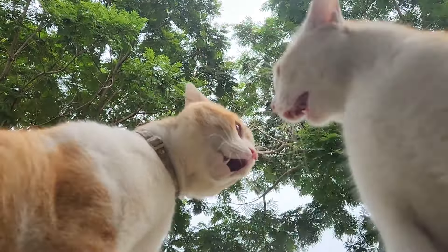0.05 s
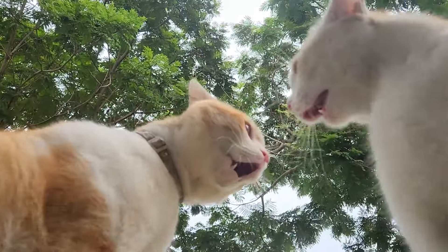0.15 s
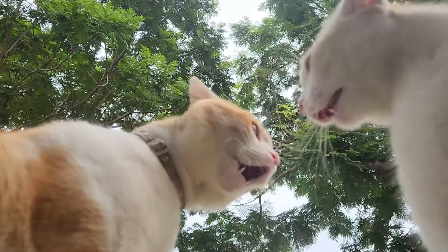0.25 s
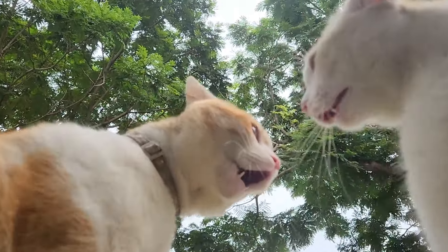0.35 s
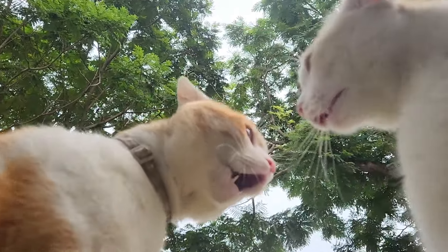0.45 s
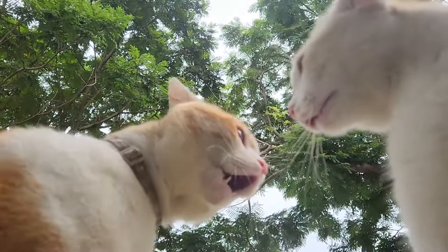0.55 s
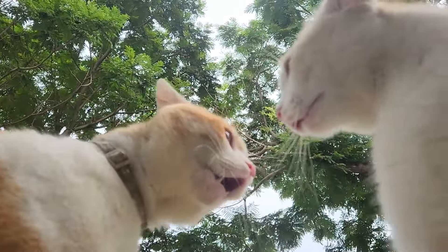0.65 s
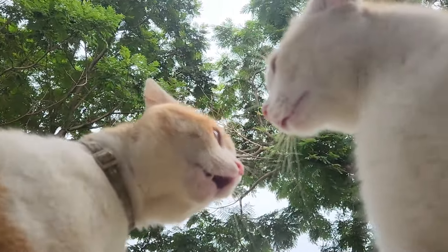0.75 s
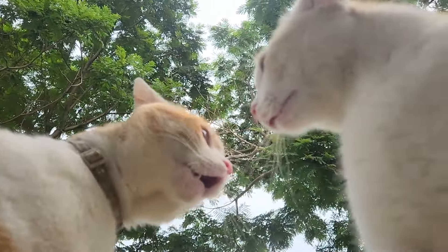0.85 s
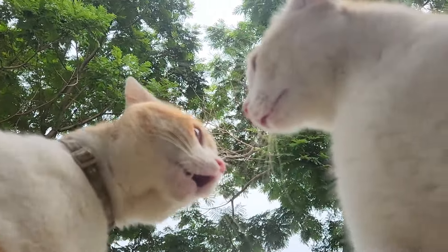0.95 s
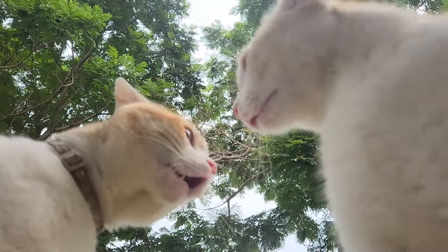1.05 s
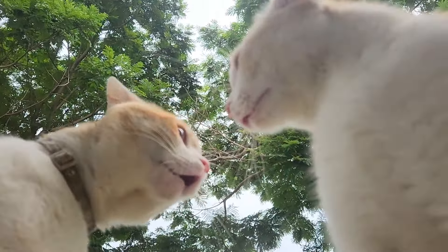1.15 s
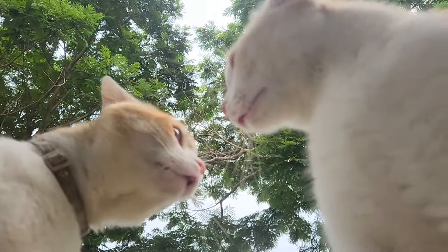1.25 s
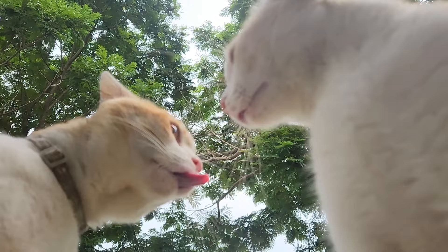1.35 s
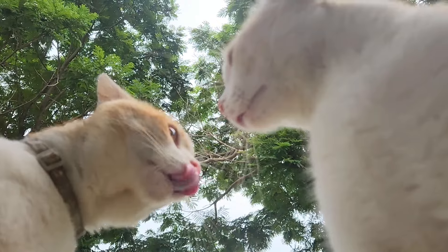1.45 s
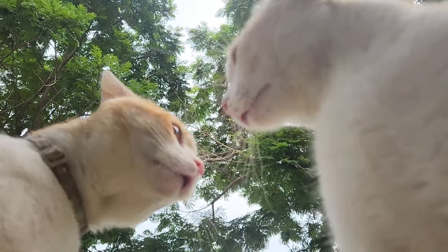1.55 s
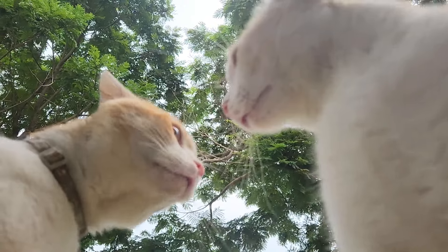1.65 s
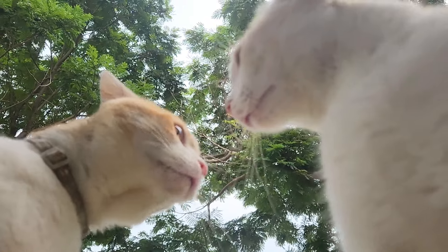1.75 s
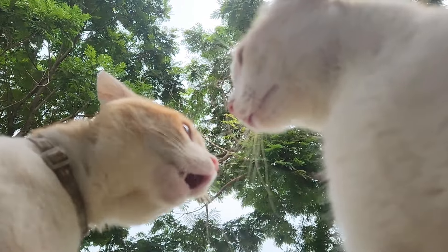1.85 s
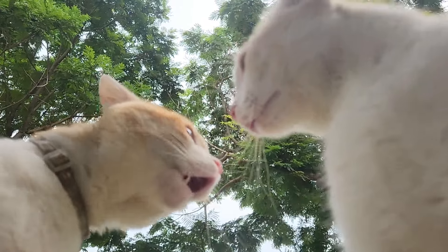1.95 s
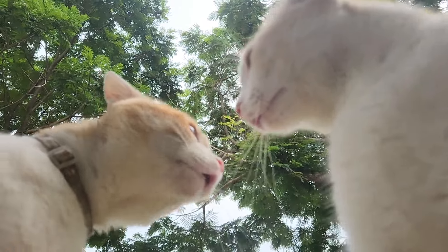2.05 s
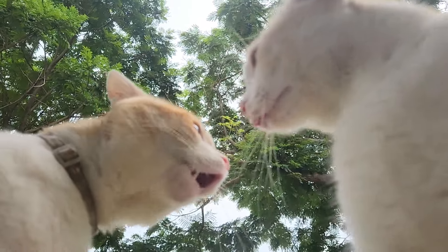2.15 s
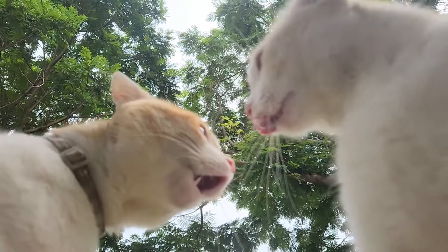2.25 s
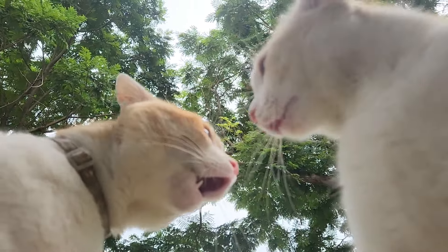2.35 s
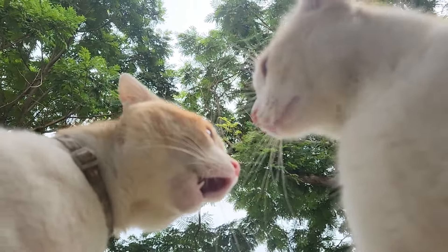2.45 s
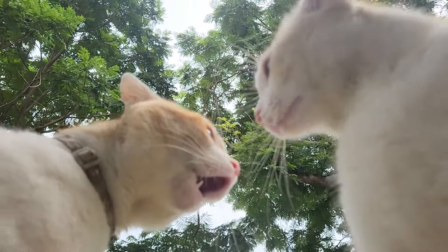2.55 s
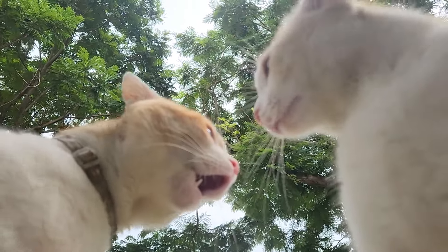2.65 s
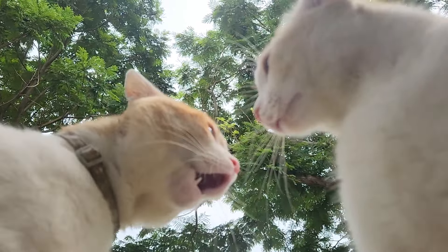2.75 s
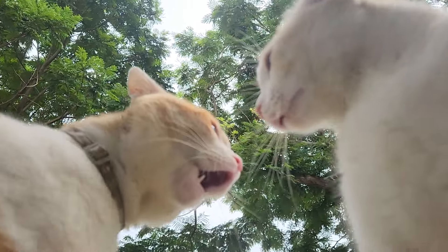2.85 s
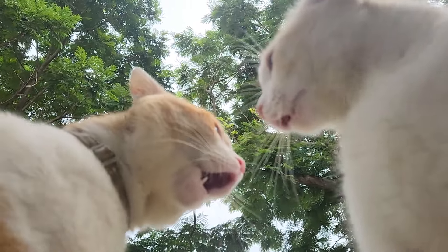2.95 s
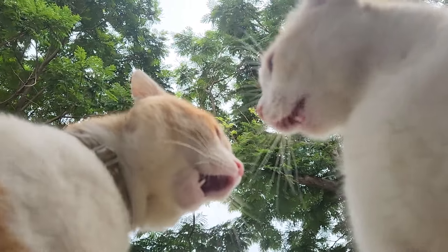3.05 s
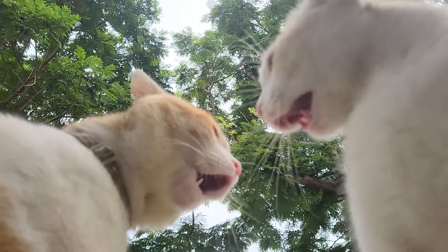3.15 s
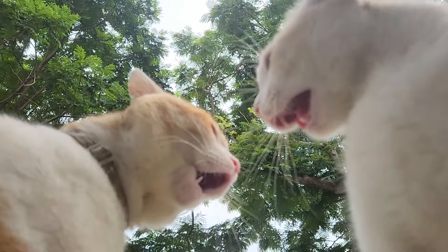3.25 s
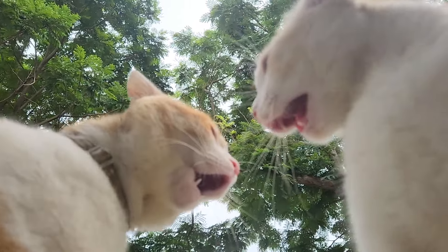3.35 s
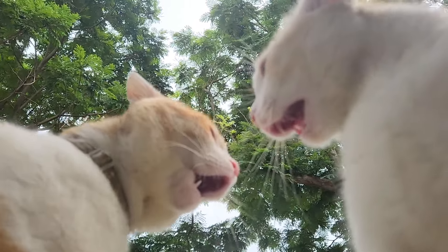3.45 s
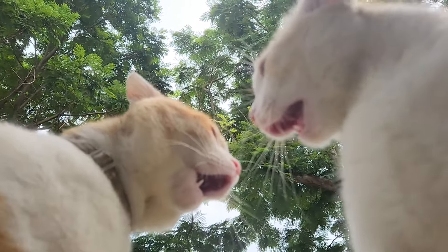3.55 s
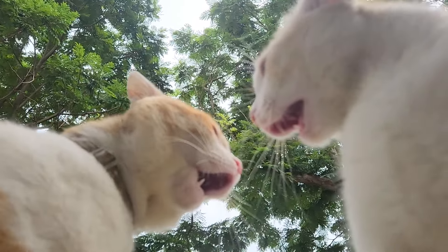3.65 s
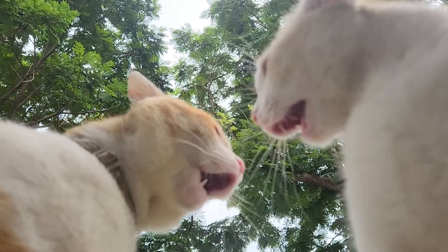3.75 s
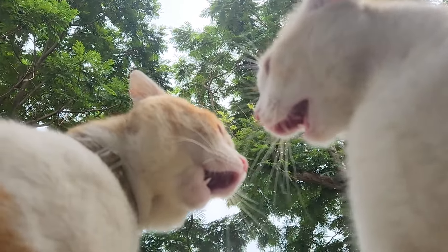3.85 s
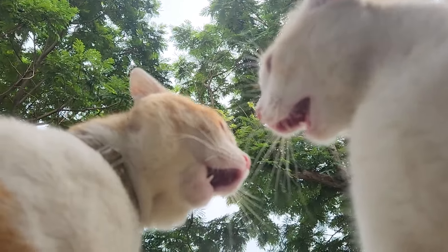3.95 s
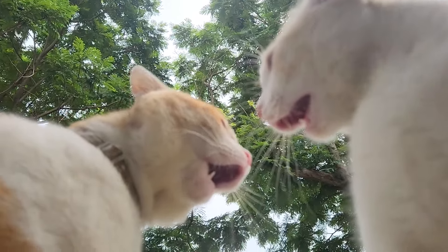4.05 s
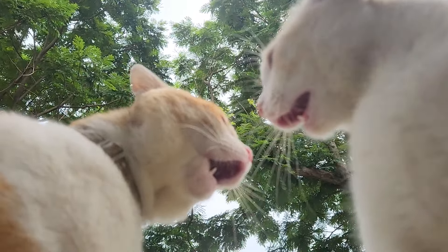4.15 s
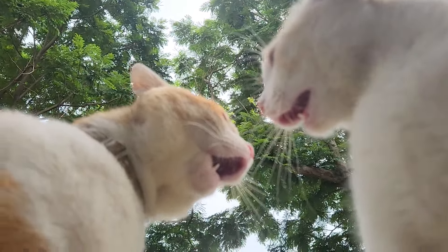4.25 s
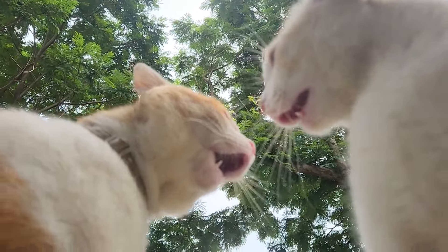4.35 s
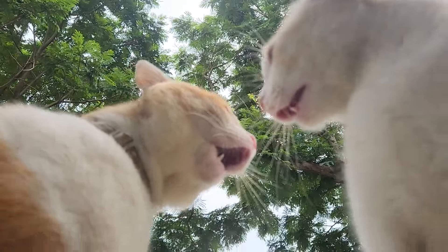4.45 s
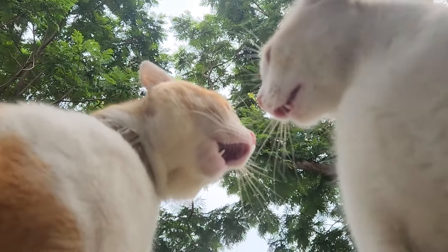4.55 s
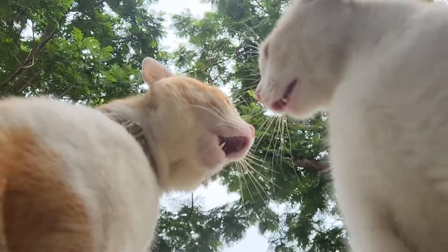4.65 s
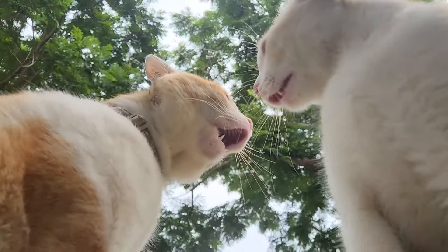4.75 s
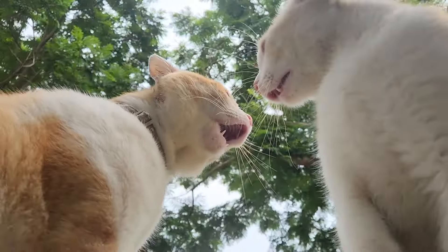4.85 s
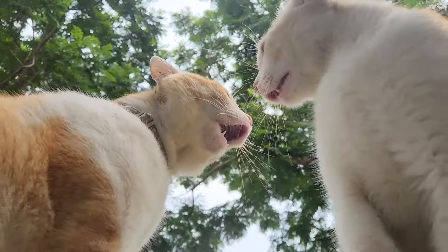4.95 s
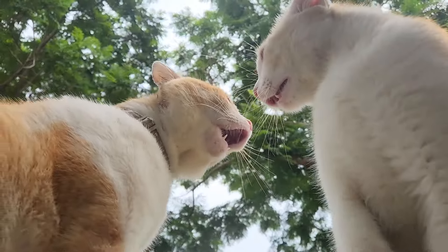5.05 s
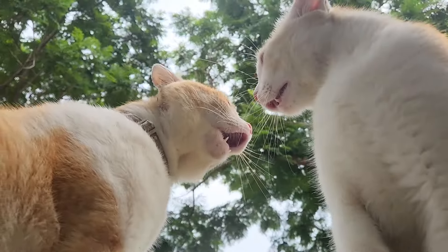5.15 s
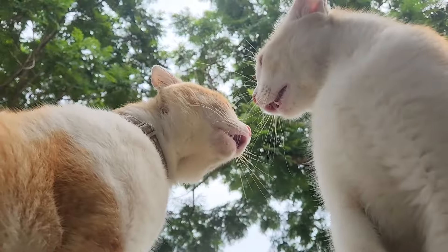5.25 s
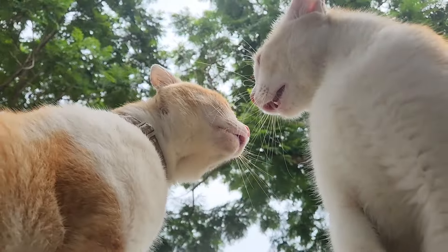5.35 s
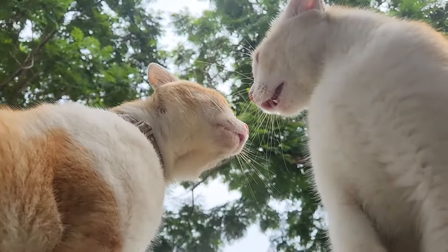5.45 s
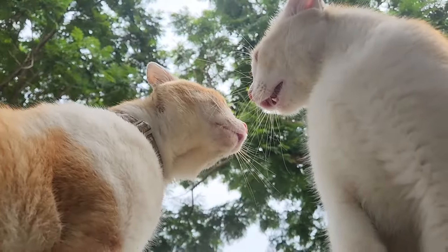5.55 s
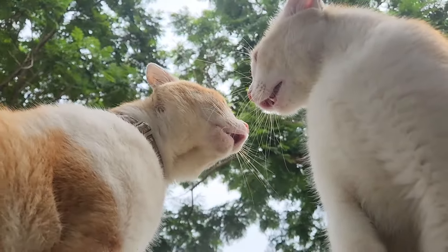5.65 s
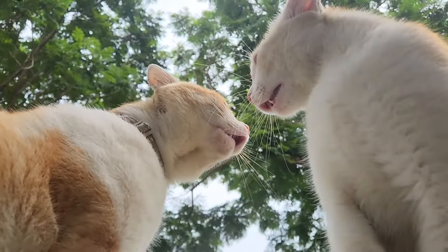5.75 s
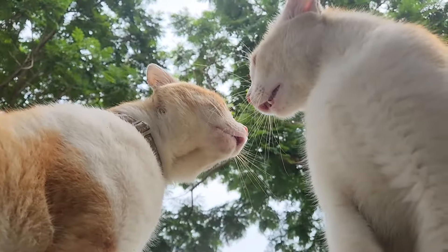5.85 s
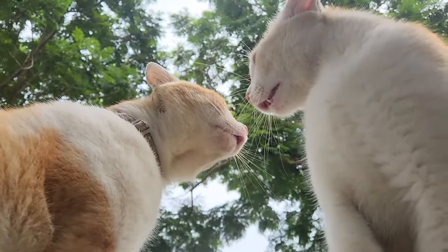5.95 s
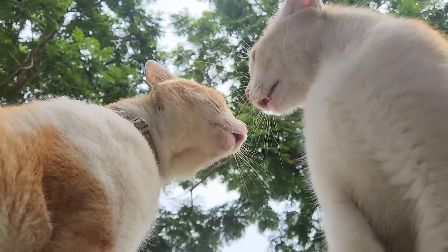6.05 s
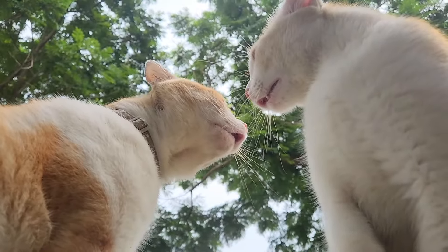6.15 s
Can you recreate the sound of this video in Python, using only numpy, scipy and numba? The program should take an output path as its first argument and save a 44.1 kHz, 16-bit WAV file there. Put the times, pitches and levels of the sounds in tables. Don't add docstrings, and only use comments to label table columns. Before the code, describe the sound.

Two cats quarrel outdoors, heard from just beneath them. A short falling yowl over a closed-mouth hum decays to a gravelly low growl, with tiny mouth ticks and faint chirps. A loud nasal howl rises suddenly and stays nearly three seconds; the other cat's hoarser yowl joins nearly in unison, sags, and swells again as a moan after the howl stops. Wind thumps the microphone, leaves rustle and a distant motor drones faintly.

```python
import sys
import numpy as np
from scipy import signal
from scipy.fft import rfft, irfft, next_fast_len
from scipy.io import wavfile
from scipy.ndimage import uniform_filter1d
from numba import njit

SR = 44100
rng = np.random.default_rng(int(sys.argv[2]) if len(sys.argv) > 2 else 0)


def inscribe(sig):
    pcm = np.round(np.clip(np.atleast_2d(sig).T, -1, 1) * 32767)
    wavfile.write(sys.argv[1], SR, pcm.astype(np.int16))


def natural_amplitude(level_db):
    exponent = np.asarray(level_db, float) / 20
    return 10 ** exponent


N = 272979

# multiple, level_db
MOTOR_LINES = [(1, -51.5), (1.5, -54), (2, -49.5), (3, -56), (4.5, -67.5)]
MOTOR_HZ = 96.4
# pitch_hz, density_db_per_hz
AIR_SPECTRUM = [(76, -44), (130, -24.5), (247, -5.5), (440, -18), (700, -21), (1680, -33), (2010, -39),
                (4500, -31), (15500, -45)]
AIR_DB = -43
# peak_s, level_db, half_length_s
GUSTS = [
    (0.89, -54, .3),
    (1.638, -34.5, 0.27),
    (2.6, -33.5, 0.34),
    (3.699, -38, .35),
    (4.551, -34, 0.27),
    (5.405, -53, 0.34),
]
CALM_DB = -46
# start_s, peak_db, pitch_hz, length_s
CHIPS = [
    (0.989, -48.5, 4840, 0.043),
    (1.773, -52.5, 4917, 0.069),
]
# start_s, peak_db, ring_hz,
# width_hz, decay_ms
CLICKS = [(1.268, -49.5, 8300, 2500, 1.1), (1.278, -63, 5326, 1498, 1.5), (1.469, -36, 2170, 1980, 3.4),
          (1.849, -47, 10910, 8260, 0.77), (1.858, -37, 9720, 9000, 1.5), (1.866, -49, 9000, 9100, 1.4),
          (1.874, -36, 5230, 4900, 5.4), (2.153, -43.5, 1690, 890, 90), (3.078, -28, 4530, 1990, 3.9),
          (4.667, -28, 9000, 9170, 3.6), (5.041, -42, 2780, 1200, 2), (5.208, -50, 3200, 1500, 2),
          (5.460, -38, 3300, 2000, 3.7), (6.093, -41.5, 3230, 3000, 1.5), (6.096, -29, 2370, 589.8, 3.3)]

# centre_hz, width_hz, level_db
GINGER_TRACT = [(2640, 1050, -9), (4750, 2100, -4), (5900, 700, -11), (7320, 780, 5), (8650, 1800, -3),
                (10050, 930, -11.5), (11930, 1050, 1), (14130, 1700, -2.5), (16840, 1600, -3.5)]
WHITE_TRACT = [(2567, 1090, 10.5), (3950, 840, -2.5), (5116, 670, 7), (7230, 2600, -16.5),
               (12400, 2200, -8.5)]
# pitch_hz, lead_rad
GINGER_PHASE = [(0, 0), (1200, .5), (3800, 3), (7400, 4.5), (9000, 4), (12000, 4.4), (15000, 4.4)]
WHITE_PHASE = [(0, 0), (2300, .25), (5800, .6), (8300, 2), (10000, 4.4), (15000, 4.4)]
# pitch_hz, level_db
GINGER_PAN = [(60, 6.5), (110, 7.5), (200, 8.0), (380, 3.5), (700, 2.0), (1290, 1.5), (2380, 2.5),
              (4400, 4.5), (8120, 4.0), (15000, -1.0)]
WHITE_PAN = [(60, 2.5), (110, 1.5), (200, 1.5), (380, 1.5), (700, 3.0), (1290, 2.5), (2380, 1.0),
             (4400, 4.0), (8120, 3.0), (15000, 1.0)]

# time_s, pitch_hz, level_db
GINGER_HUM = [
    (0.0, 327.7, -22),
    (0.25, 303.4, -22),
    (0.51, 290.6, -22.5),
    (0.55, 275.4, -25),
    (0.58, 255, -48),
]
# time_s, pitch_hz, level_db
GINGER_HOWL = [(2.21, 438, -53), (2.26, 416, -26), (2.3, 426, -28.5), (2.38, 429, -15.5),
               (2.43, 438, -13.5), (2.73, 446.5, -13.5), (2.98, 434.8, -15.5), (3.15, 430, -13.5),
               (3.3, 405.7, -16)]
# time_s, pitch_hz, level_db
GINGER_HOLD = [(3.479, 388.8, -18.5), (3.768, 374.3, -19.5), (3.9, 381.2, -18.5), (4.101, 383.3, -17.5),
               (4.3, 361.4, -18), (4.489, 366.6, -16.5), (4.97, 368.1, -17.5), (5.08, 357, -19.5),
               (5.188, 325, -24.5)]
SCOOP_HZ, SCOOP_S = 323, 0.16
# time_s, pitch_hz, level_db
WHITE_FALL = [(0.0, 412.6, -16), (0.1, 369.3, -19.5), (0.15, 361, -15), (0.26, 324.4, -29.5),
              (0.32, 302, -28), (0.45, 284.2, -30.5)]
# time_s, pitch_hz, level_db
WHITE_GROWL = [(0.601, 253.4, -30.5), (0.772, 247, -30.5), (0.852, 235.3, -31), (0.928, 236.5, -30.5),
               (1.001, 216, -31.5), (1.126, 204.3, -30), (1.579, 175.2, -30.5), (1.849, 148.2, -33),
               (1.92, 138, -46)]
# time_s, pitch_hz, level_db
WHITE_YOWL = [(2.992, 163.2, -36), (3.08, 247.7, -25.5), (3.25, 401, -23), (3.45, 412.7, -22.5),
              (3.55, 386.1, -26.5), (3.922, 378, -20.5), (4.091, 361.8, -22.5), (4.2, 336, -28),
              (4.4, 322, -26)]
# time_s, pitch_hz, level_db
WHITE_MOAN = [(4.498, 315, -31), (4.77, 267.3, -29), (5.071, 256, -28), (5.309, 305.3, -26),
              (5.42, 317.8, -25), (5.562, 311.2, -24), (5.702, 293.7, -31), (5.898, 266.6, -31),
              (6.19, 255.2, -28)]

# peak_s, pitch_jump_percent, half_length_s
GINGER_WAVERS = [(2.745, 5.5, 0.048), (2.88, 5, 0.037), (2.955, -2, 0.025), (3.03, 13, .033),
                 (3.082, -6.5, 0.018), (3.15, 3.5, .03), (3.235, 2, 0.026)]
WHITE_WAVERS = [(4.33, 3, .04), (5.6, 0, 0.017), (5.63, 6.5, 0.017), (6.07, 4, .09)]
# start_s, end_s, unsteadiness_db
GINGER_BREAKS = [
    (2.265, 2.33, 16),
    (2.69, 2.72, 10),
    (3.05, 3.1, 12),
    (5.165, 5.2, 22),
]
WHITE_BREAKS = [(.2, .3, 15), (.4, .58, 14), (1.86, 1.92, 18), (3.0, 3.24, 21), (3.24, 3.6, 12),
                (4.28, 4.4, 19), (5.18, 5.33, 12), (5.6, 5.76, 21)]
BREAK_FADE_DB_PER_S = 400
# start_s, end_s, half_pitch_lines_db
GINGER_DOUBLING = [(2.68, 2.92, -30)]
WHITE_DOUBLING = [(0.25, 0.9, -9.5), (3.24, 3.54, 11.5), (4.3, 4.8, -13), (5.13, 5.35, -15),
                  (5.4, 5.5, -24), (5.65, 5.72, 0), (5.74, 5.95, -16)]
DOUBLING_FADE_DB_PER_S = 304
# start_s, end_s, cavity_under_voice_db
SNARL = [
    (3.4, 4.05, -12),
    (4.05, 5.2, -21),
]
CHEEK_HZ, SNARL_EDGE_DB, SNARL_FADE_DB_PER_S = 2037, -11, 56

# time_s, mouth_hz, lips_parted (0 shut, 1 open, may pass either), marker_resonance_hz
GINGER_JAW = [(0, 1770, 0.03, 9280), (.58, 1750, -.1, 9100), (2.21, 760, .5, 5200),
              (2.26, 1320, 0.32, 5660), (2.329, 1560, 0.46, 5900), (2.43, 1348, 0.93, 6400),
              (2.63, 1517, 1.01, 7440), (2.87, 1578, .85, 7480), (3.002, 1613, 0.64, 7850),
              (3.1, 1440, 1, 7840), (3.4, 1316, 0.84, 8030), (3.8, 1270, 0.73, 7940),
              (4.05, 1355, 0.79, 7600), (4.3, 1266, 0.71, 6010), (4.5, 1235, .85, 5900),
              (5.0, 1268, 0.86, 5800), (5.2, 1180, 0.79, 5750)]
WHITE_JAW = [(0, 2130, 1.12, 6760), (.15, 1483, 1.23, 6080), (.26, 1065, 0.87, 5400),
             (.36, 1350, 0.28, 5100), (.6, 1350, 0.17, 4280), (1.92, 1290, 0.19, 4200),
             (2.991, 898, 0.47, 4930), (3.101, 1590, 0.88, 5760), (3.25, 2064, 1.04, 6910),
             (3.92, 2027, 0.93, 6470), (4.089, 1472, 0.97, 5840), (4.301, 1080, 0.9, 4400),
             (4.55, 850, .7, 4350), (5.0, 925, 0.57, 4240), (5.2, 958, 1.01, 4470),
             (5.452, 1150, 1.07, 5280), (5.68, 820, 0.87, 4500), (6.19, 1230, 0.24, 4260)]
GINGER_MARKER_HZ, WHITE_MARKER_HZ = 7457, 5080
# mouth_shut_db, mouth_open_db (over throat), upper_shut_db, upper_open_db, upper_db_per_stretch
GINGER_LIPS = (-34.5, 11, -30, -32.5, 4)
WHITE_LIPS = (-38, 12, -43, -18, 8.5)
SHUT_THROAT_ORDER, OPEN_THROAT_SHARE, THROAT_BEND = 1.83, 0.614, 2.5
PATCHY_DB, PATCHES_PER_S = 4, 9


@njit
def svf(x, hz, width):
    y, b, l = np.empty(len(x)), 0., 0.
    for i in range(len(x)):
        g, k = np.tan(np.pi * hz[i] / SR), width / hz[i]
        v = (b + g * (x[i] - l)) / (1 + g * (g + k))
        b, l, y[i] = 2 * v - b, l + 2 * g * v, k * v
    return y


def band(x, hz, width):
    return svf(x, np.clip(hz + np.zeros(len(x)), 10, SR / 2.2), 1. * width)


def unit(x):
    return x / np.sqrt(np.mean(x ** 2, axis=-1, keepdims=True))


def walk(rate, size=N):
    k = int(SR / rate)
    steps = np.repeat(rng.standard_normal(size // k + 1), k)
    return unit(uniform_filter1d(uniform_filter1d(steps, k), k)[:size])


def log_interp(hz, table):
    table_hz, db = np.transpose(table)
    return np.interp(np.log(hz), np.log(table_hz), db)


def ports(x, phase, pan, lag_ms):
    size = next_fast_len(N + SR // 10)
    f = np.fft.rfftfreq(size, 1 / SR)
    lead = np.interp(f, *np.transpose(phase)) + 2 * np.pi * f * lag_ms / 1000
    half = natural_amplitude(log_interp(f + 1, pan) / 2) * np.exp(0.5j * lead)
    pair = np.array([half, 1 / half]) / np.abs(half + 1 / half).clip(1) * 2
    sensitivity = natural_amplitude(np.array([[0.75], [-0.75]]))
    return irfft(rfft(x, size) * pair, size)[:, :N] * sensitivity


def leaves():
    out, swell = 0, walk(1.0)
    for hz in 140 * 2 ** np.arange(0, 7, .5):
        mid, side = (band(band(rng.standard_normal(N), hz, hz / 2), hz, hz / 2) for _ in range(2))
        db = log_interp(hz, AIR_SPECTRUM) + 0.95 * swell + 2 * walk(8.6)
        spread = min(0.32 + hz / 5000, 1)
        out = out + natural_amplitude(db) * (mid + spread * side * np.array([[1], [-1]]))
    return unit(out) * natural_amplitude(AIR_DB - 6.5)


def motor():
    turn = 2 * np.pi * MOTOR_HZ * np.cumsum(1 + 0.00394 * walk(2.16)) / SR
    return sum(natural_amplitude(db + 0.96 * walk(1.8)) * np.sqrt(2) * np.sin(k * turn) for k, db in MOTOR_LINES)


def surroundings():
    return (leaves() + motor()) * natural_amplitude(np.array([[1.5], [-1.5]]))


def wind():
    t = np.arange(N) / SR
    gust = natural_amplitude(CALM_DB) + sum(natural_amplitude(db) * np.exp(-((t - s) / half) ** 2) for s, db, half in GUSTS)
    out, lean = 0, natural_amplitude(np.array([[2.5], [-3.5]]))
    for hz, db in ((33, -8), (50, 4.0), (72, -22), (100, -0.5)):
        mid, side = (band(band(rng.standard_normal(N), hz, hz / 0.93), hz, hz / 1.8) for _ in range(2))
        eddy = unit(mid) * lean + 0.21 * unit(side) * np.array([[1], [-1]])
        out = out + natural_amplitude(db + 4.7 * walk(8)) * eddy
    return gust * out / np.sqrt(np.mean(out.mean(axis=0) ** 2))


def bird():
    out, t = np.zeros(N), np.arange(SR // 8) / SR
    for s, db, hz, length in CHIPS:
        shape = t / length * np.exp(1 - 4 * t / length) * 4
        warble = hz * (1 + 0.095 * np.sin(2 * np.pi * 230 * t))
        i = int(s * SR)
        out[i:i + len(t)] += natural_amplitude(db) * shape * np.sin(2 * np.pi * np.cumsum(warble) / SR)
    return out


def clicks():
    out, t = np.zeros(N), np.arange(SR // 8) / SR
    for s, db, hz, width, ms in CLICKS:
        tick = band(rng.standard_normal(len(t)) * np.exp(-t * 1000 / ms), hz, width)
        i = int(s * SR)
        out[i:i + len(t)] += (natural_amplitude(db) * tick / np.abs(tick).max())[:N - i]
    return out


@njit
def stack(phase, gains, twist, hop):
    y = np.zeros(len(phase))
    for i in range(len(phase)):
        j, a = i // hop, (i % hop) / hop
        turn = np.exp(1j * phase[i])
        z = turn
        for k in range(gains.shape[1]):
            y[i] += (gains[j, k] + a * (gains[j + 1, k] - gains[j, k])) * (z * twist[k]).imag
            z *= turn
    return y


def peak(f, hz, width):
    return width / hz / np.abs(1 - (f / hz) ** 2 + 1j * f * width / hz ** 2)


def spells(t, rows, fade):
    return np.max([db - fade * np.maximum(start - t, t - end).clip(0) for start, end, db in rows], axis=0)


def pitch_of(t, table, wavers, scoop_hz):
    s, hz, _ = np.transpose(table)
    bend = sum(jump * np.exp(-((t - when) / half) ** 2) for when, jump, half in wavers)
    return (np.interp(t, s, hz) - scoop_hz * np.exp(-(t - s[0]) / SCOOP_S)) * (1 + bend / 100)


def throat_and_mouth(f, pitch, mouth, parted, lips, throat_width, mouth_width):
    share = parted.clip(0, 1) ** THROAT_BEND
    throat = (1 - share) * SHUT_THROAT_ORDER * pitch + share * OPEN_THROAT_SHARE * mouth
    mouth_db = lips[0] + parted * (lips[1] - lips[0])
    low = np.sqrt(f / throat) * peak(f, throat, throat_width) / (1 + (f / mouth / 0.85) ** 10)
    return low + natural_amplitude(mouth_db) * peak(f, mouth, mouth_width) ** 3


def upper_resonances(f, stretch, tract, hop):
    high = 0
    for hz, width, db in tract:
        patch = PATCHY_DB * walk(PATCHES_PER_S, size=len(f) * hop)[::hop, None]
        high = high + natural_amplitude(db + patch) / np.abs(1 + 1j * (f / stretch - hz) * 2 / width) ** 3
    return high * (f < SR / 2.5)


def yowl(table, wavers, breaks, tract, jaw, lips, marker, jitter, shimmer, breath_db, throat_width=200,
         mouth_width=450, scoop_hz=0, spread=.03, snarl=None, doubling=None, hop=128):
    s, _, level = np.transpose(table)
    start = int(s[0] * SR)
    size = min(int((s[-1] - s[0]) * SR) + SR // 100, N - start)
    t = (s[0] + np.arange(size // hop + 2) * hop / SR)[:, None]
    pitch, level_db = pitch_of(t, table, wavers, scoop_hz), np.interp(t, s, level)
    when, *columns = np.transpose(jaw)
    mouth, parted, upper = (np.interp(t, when, c) for c in columns)
    stretch = upper / marker
    upper_db = lips[2] + parted.clip(0, 1) * (lips[3] - lips[2]) + lips[4] * (stretch - 1)

    order = np.arange(1, 101) / 2
    f, whole = order * pitch, order % 1 == 0
    low = throat_and_mouth(f, pitch, mouth, parted, lips, throat_width, mouth_width)
    high = upper_resonances(f, stretch, tract, hop)
    gains = low / np.linalg.norm(low[:, whole], axis=1, keepdims=True)
    if snarl:
        cheek_db = spells(t, snarl, SNARL_FADE_DB_PER_S)
        gains = gains + natural_amplitude(cheek_db) * peak(f, CHEEK_HZ, 990) ** 3
        upper_db = np.maximum(upper_db, cheek_db + SNARL_EDGE_DB)
    gains = gains + natural_amplitude(upper_db) * high / np.linalg.norm(high[:, whole], axis=1, keepdims=True)
    half = natural_amplitude(spells(t, doubling, DOUBLING_FADE_DB_PER_S)) if doubling else 0
    gains = gains * np.where(whole, 1, half) * natural_amplitude(level_db) * np.sqrt(2 / (1 + half ** 2))

    fine = s[0] + np.arange(size) / SR
    hz = pitch_of(fine, table, wavers, scoop_hz)
    climb = uniform_filter1d(np.gradient(np.log(hz)) * SR, size=2048).clip(0)
    strain = np.maximum(1 + 0.707 * climb, natural_amplitude(spells(fine, breaks, BREAK_FADE_DB_PER_S)))
    hz = hz * (1 + jitter * strain * (walk(25.32, size=size) + walk(150, size=size)))
    phase = np.pi * np.cumsum(hz) / SR
    twist = np.exp(-1.3j * order - 1j * spread * order ** 2)
    voice = stack(phase, gains, twist, hop) * (1 + shimmer * np.sqrt(strain) * walk(300, size=size))

    puffs = rng.standard_normal(size) * (1 + np.cos(2 * phase))
    moving = np.interp(fine, t[:, 0], stretch[:, 0])
    air = sum(natural_amplitude(db) * band(band(puffs, f0 * moving, w), f0 * moving, w) for f0, w, db in tract)
    air_db = np.interp(fine, t[:, 0], (level_db + upper_db)[:, 0]) + breath_db
    voice = voice + unit(air) * natural_amplitude(air_db)

    since = fine - fine[0] + (fine[0] == 0)
    left = s[-1] - fine + (s[-1] > 6)
    edge = np.minimum(1, np.minimum(since, left) / 0.0027).clip(0)
    return np.pad(voice * edge, (start, N - start - size))


def white_cat():
    cat = dict(wavers=WHITE_WAVERS, breaks=WHITE_BREAKS, tract=WHITE_TRACT, jaw=WHITE_JAW, lips=WHITE_LIPS,
               marker=WHITE_MARKER_HZ, doubling=WHITE_DOUBLING, jitter=.0012, shimmer=.035, breath_db=-11)
    growl = yowl(WHITE_FALL + WHITE_GROWL, **cat)
    answer = yowl(WHITE_YOWL + WHITE_MOAN, **cat)
    return ports(growl, WHITE_PHASE, WHITE_PAN, 0.1) + ports(answer, WHITE_PHASE, WHITE_PAN, .001)


def ginger_cat():
    cat = dict(wavers=GINGER_WAVERS, breaks=GINGER_BREAKS, tract=GINGER_TRACT, jaw=GINGER_JAW,
               lips=GINGER_LIPS, marker=GINGER_MARKER_HZ)
    hum = yowl(GINGER_HUM, **cat, jitter=0.00078, shimmer=0.031, breath_db=-2.0, throat_width=28)
    howl = yowl(GINGER_HOWL + GINGER_HOLD, **cat, jitter=.0012, shimmer=.035, breath_db=-11,
                scoop_hz=SCOOP_HZ, snarl=SNARL, spread=.8, doubling=GINGER_DOUBLING,
                throat_width=175, mouth_width=610)
    return ports(hum, GINGER_PHASE, GINGER_PAN, -0.037) + ports(howl, GINGER_PHASE, GINGER_PAN, 0.0038)


def cats():
    near = white_cat() + ginger_cat()
    t = np.arange(SR // 2) / SR
    decay = natural_amplitude(-60 * t / .5) * (t > .008)
    scatter = unit(rng.standard_normal((2, len(t))) * decay) / np.sqrt(len(t))
    return near + natural_amplitude(-20) * signal.fftconvolve(near.mean(axis=0)[None], scatter, axes=1)[:, :N]


def scene():
    small = ports(bird() + clicks(), WHITE_PHASE, GINGER_PAN, 0.06)
    return surroundings() + wind() + small + cats()


def top_cut(x):
    return signal.sosfilt(signal.butter(12, 15550, fs=SR, output="sos"), x)


def record(dry):
    return top_cut(dry)


dry = scene()
out = record(dry)
inscribe(out)
```